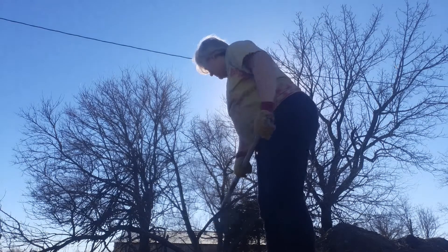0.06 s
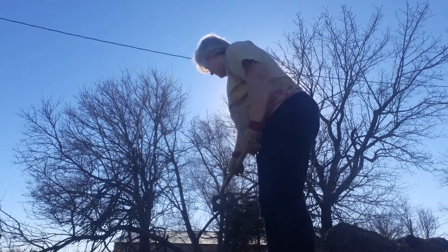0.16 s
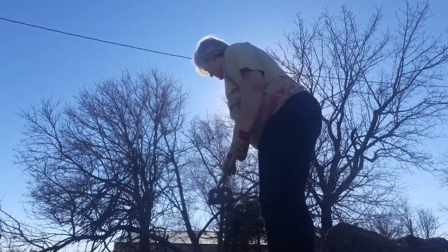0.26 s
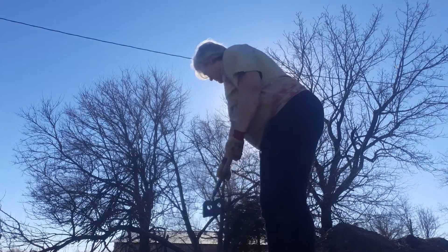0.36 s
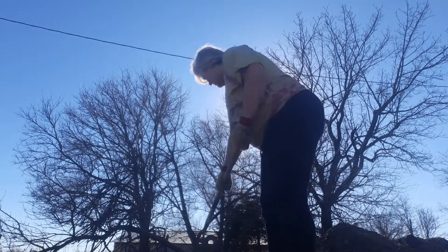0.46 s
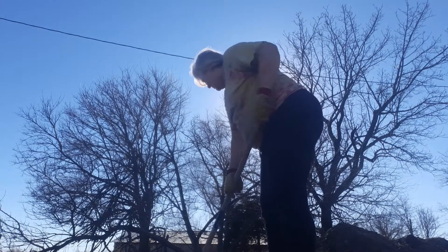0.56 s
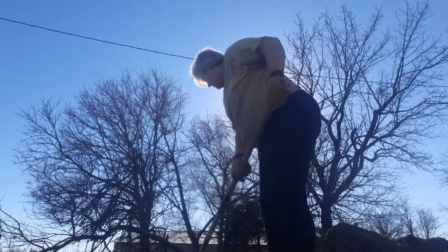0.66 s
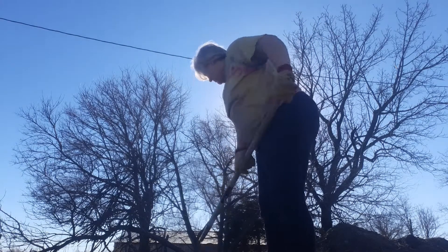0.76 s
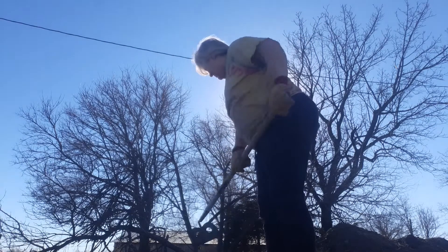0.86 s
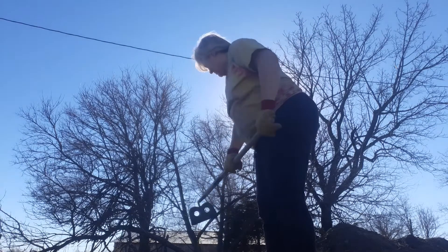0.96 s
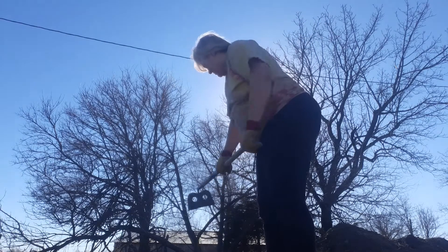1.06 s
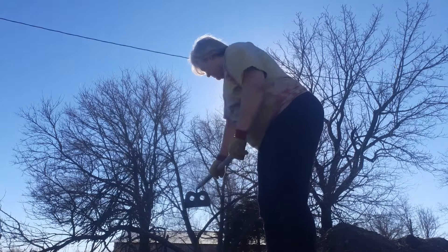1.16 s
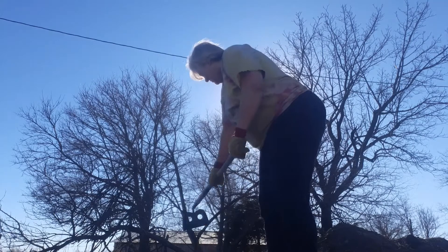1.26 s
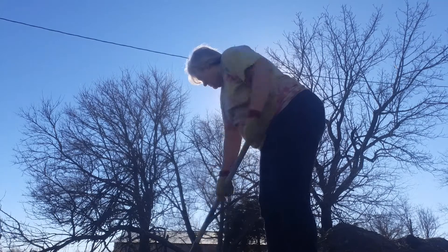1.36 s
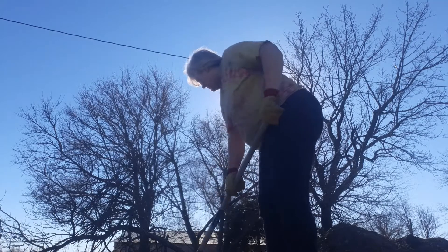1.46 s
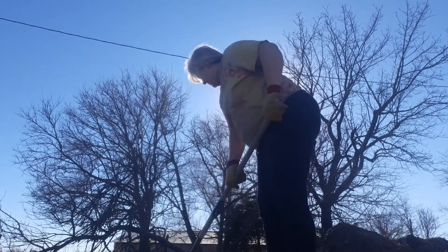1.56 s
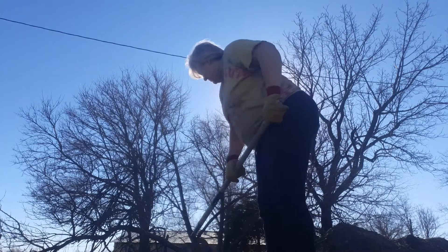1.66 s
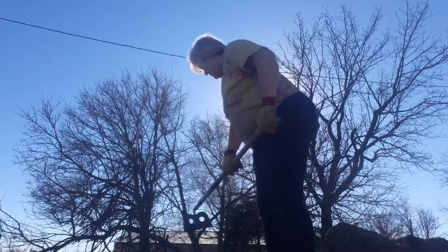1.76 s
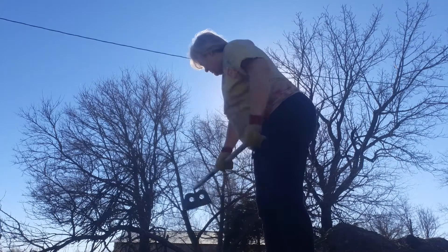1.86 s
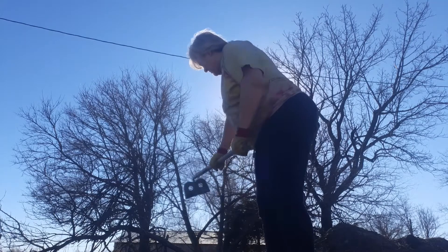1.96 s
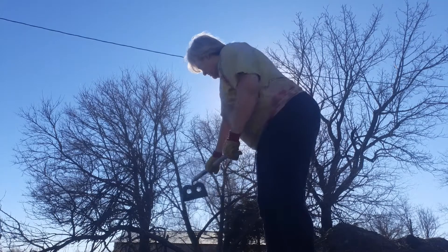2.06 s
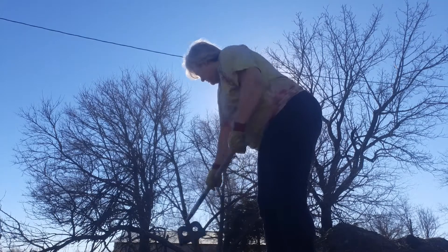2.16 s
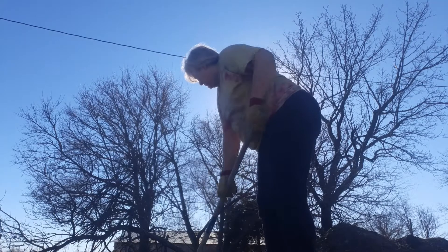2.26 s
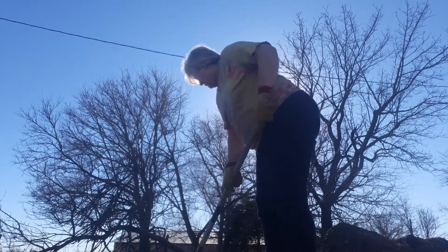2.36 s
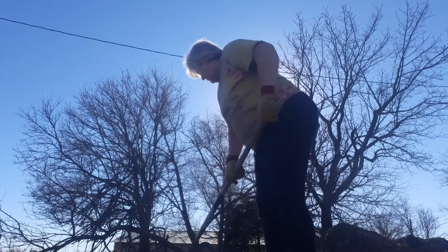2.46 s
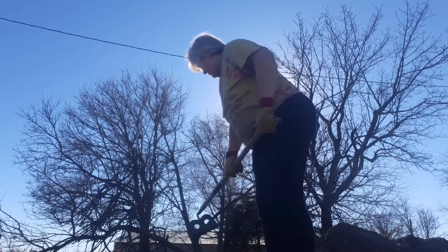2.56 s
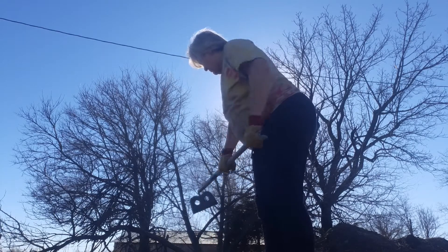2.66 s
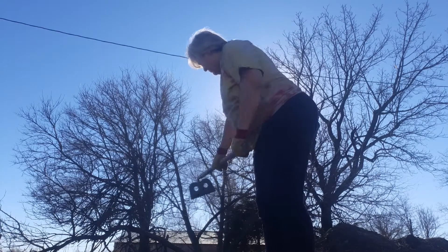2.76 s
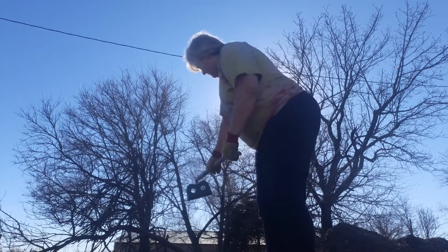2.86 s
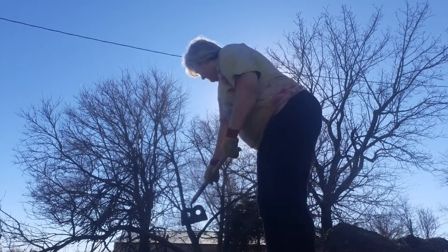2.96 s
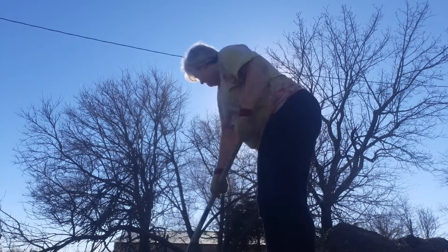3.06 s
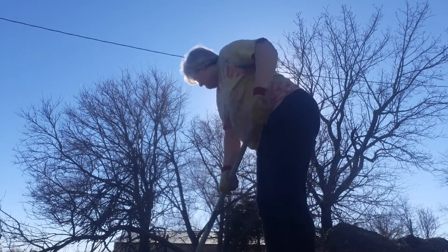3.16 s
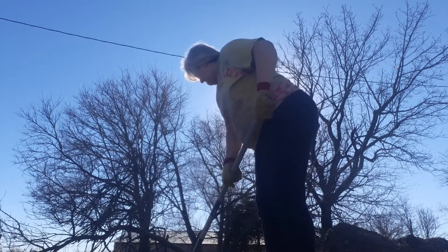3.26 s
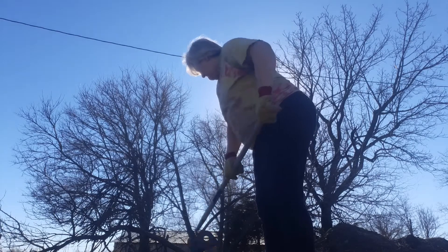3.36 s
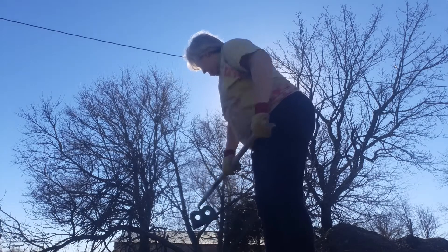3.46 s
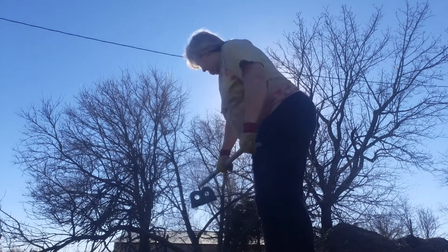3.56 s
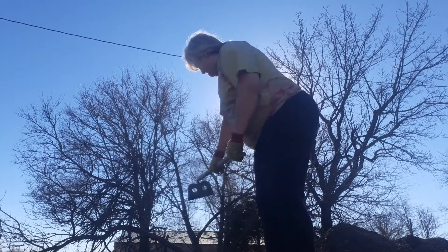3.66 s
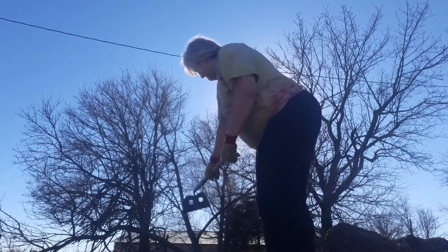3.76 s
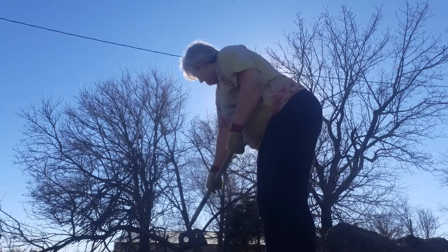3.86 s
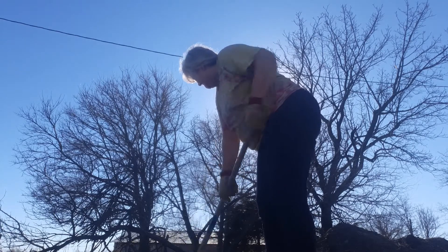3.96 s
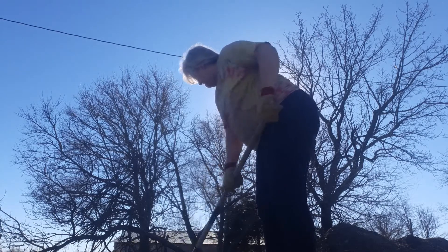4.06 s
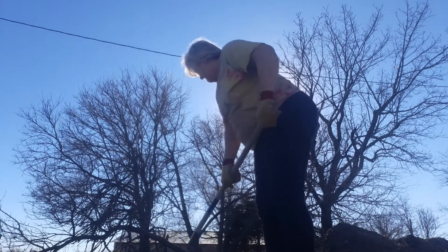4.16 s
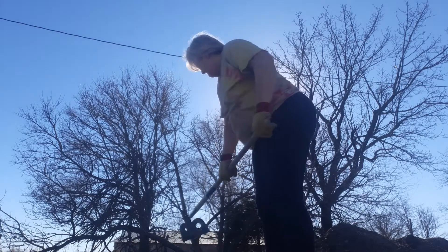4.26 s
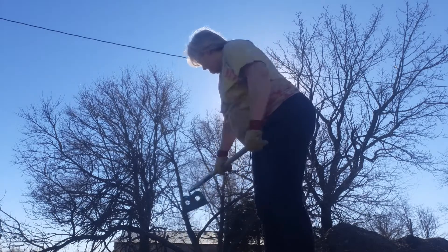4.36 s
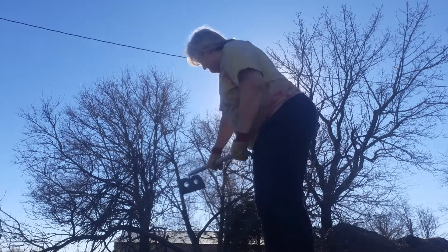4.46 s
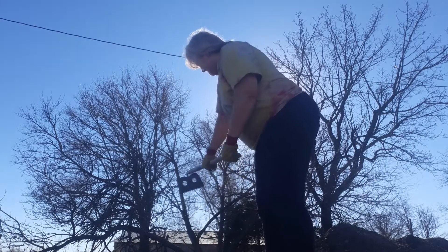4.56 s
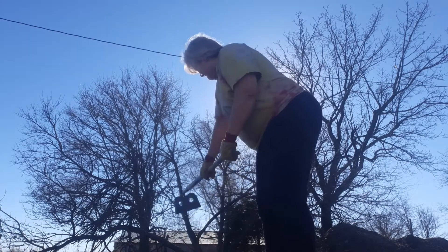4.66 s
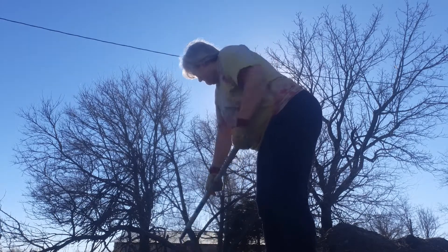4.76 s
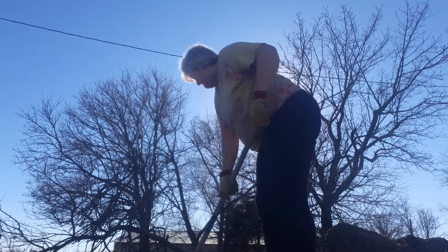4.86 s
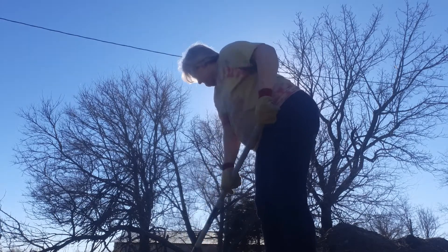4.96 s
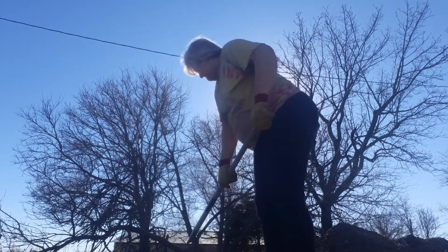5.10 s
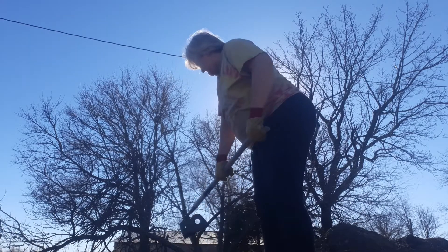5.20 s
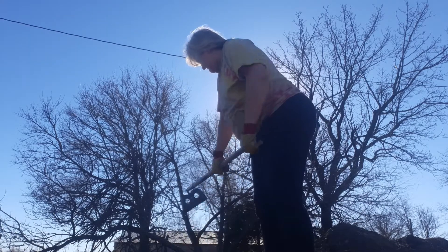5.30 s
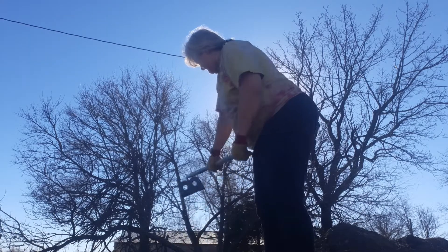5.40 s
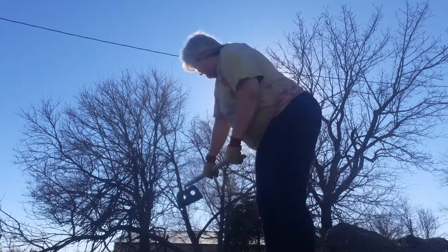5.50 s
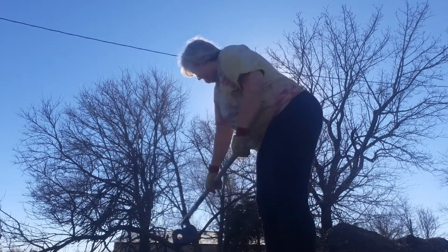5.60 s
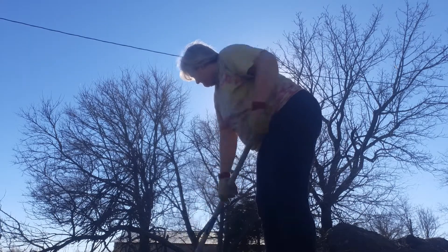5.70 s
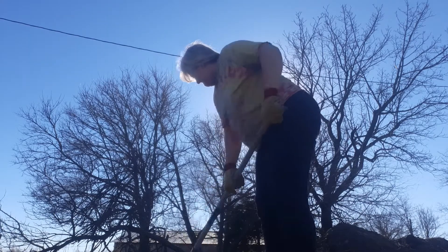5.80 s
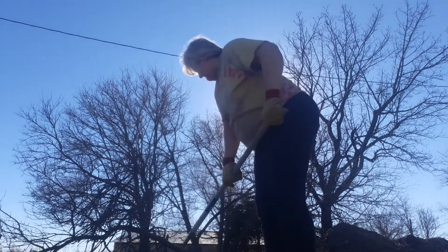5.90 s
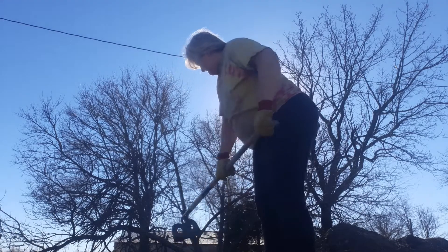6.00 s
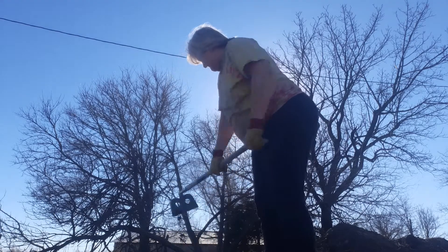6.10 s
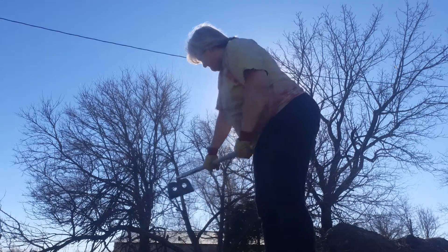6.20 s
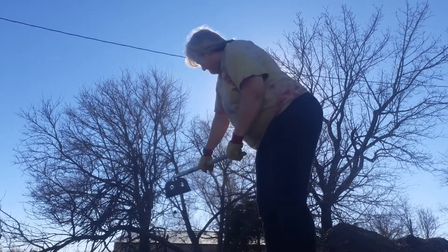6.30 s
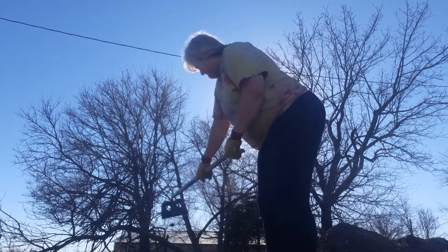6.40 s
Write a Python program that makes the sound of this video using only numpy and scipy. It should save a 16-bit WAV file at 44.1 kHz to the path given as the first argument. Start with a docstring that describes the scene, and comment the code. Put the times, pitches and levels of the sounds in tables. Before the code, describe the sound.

Outdoors, with a small stereo microphone close to the soil, a hoe strikes at an even, unhurried pace. Steel clunks dully into dry clods, with crunching grit and a soft falling thump, and the buried blade stops ringing almost at once. Thin, bright trickles of loose earth, tiny grain ticks and faint tool scuffs fill the gaps. Seven chops in all, the final one clipping a stone. A low rumble and faint microphone hiss continue.

```python
"""A steel garden hoe chops into dry soil seven times, close to a small two-port microphone near the ground.
Grit scrapes and clods knock the blade into ringing; gritty crunch and a thud falling in pitch join each chop.
Loose earth hisses off the blade as dense random grains, with single grains ticking and the tool scuffing
in between; late on, the blade glances off a stone. Low rumble, a faint hum, open air and hiss lie underneath."""
import sys
import numpy as np
from scipy import signal
from scipy.fft import rfft, irfft, next_fast_len
from scipy.io import wavfile

SR = 44100
rng = np.random.default_rng(int(sys.argv[2]) if len(sys.argv) > 2 else 0)


def output_pcm(signal):
    """Save a mono or channel-first signal as 16-bit PCM at the path in sys.argv[1].

    Samples are clipped to [-1, 1] before scaling.
    """
    pcm = np.clip(np.atleast_2d(signal).T, -1, 1) * 32767
    wavfile.write(sys.argv[1], SR, np.round(pcm).astype(np.int16))


N = 284004
SIZE = next_fast_len(N + 4096)   # FFT length, with room for filter tails
HZ = np.maximum(np.arange(SIZE // 2 + 1) * SR / SIZE, 1)

# All table levels are relative: layer gains, the ports and the final filters shape them further.
# background, with a faint hum around 800 to 1000 Hz: time_s, rumble_db, air_db, faint_hum_db
BACKGROUND_LEVELS = [(0.0, -64.5, -81.5, -98), (0.5, -68.5, -82.5, -100), (0.9, -62.5, -76.5, -90.5),
                     (1.3, -67, -82.5, -99), (1.9, -63.5, -79, -91), (2.25, -64, -83, -100),
                     (2.8, -59, -82, -91), (3.4, -64, -79, -88), (4.0, -63.5, -83.5, -97.5),
                     (4.7, -65, -80.5, -94), (5.35, -66, -80, -86.5), (5.7, -65.5, -83, -99.5),
                     (6.44, -66, -80.5, -90)]
# earth pouring off the blade: start_s, end_s, high_hiss_db, band_near_8500_hz_db, rustle_db, dying_db_per_s
POURS = [(0.0, 0.13, -78.5, -80.5, -88.5, 113), (0.157, 0.21, -101, -94, -85.5, 68),
         (0.66, 0.684, -62, -66.5, -78, 503), (0.839, 0.965, -68.5, -72.5, -83, 125),
         (1.168, 1.226, -86.5, -87.5, -109, 142), (1.676, 1.788, -76, -75.5, -93, 97.5),
         (1.843, 2.044, -99.5, -93, -86.5, 101.5), (2.57, 2.737, -78, -79, -88.5, 165.5),
         (3.426, 3.565, -90, -85.5, -93, 130), (3.612, 3.652, -88, -81, -98, 132.5),
         (3.81, 3.887, -94, -85.5, -92.5, 169.5), (4.392, 4.55, -89, -85, -90, 116),
         (5.042, 5.123, -85, -82, -93.5, 128.5), (5.2, 5.284, -79, -79.5, -83.5, 165),
         (6.023, 6.06, -78.5, -79, -89, 121.5), (6.144, 6.257, -82.5, -78, -86.5, 81),
         (6.367, 6.438, -90, -82.5, -108, 131)]
# knocks of clods and pebbles on the blade: start_s, level_db, dullness (0-1)
KNOCKS = [(0.581, -28, 0.02), (0.591, -24, 0.66), (0.635, -36.5, 0.36), (0.659, -48, 0.4),
          (1.435, -33.5, 0.5), (1.442, -21.5, 0.23), (1.471, -28.5, 0.34), (1.49, -44.5, 1),
          (2.295, -32, 0.67), (2.301, -26, 0.53), (2.309, -25.5, 0.24), (2.319, -56, 0.7),
          (2.331, -35, 0.65), (2.348, -34.5, 0.47), (3.138, -31, 0.23), (3.147, -22.5, 0.48),
          (3.17, -26, 0.69), (3.19, -56, 0.5), (3.997, -26, 0.36), (4.008, -35.5, 0), (4.03, -58, 0.4),
          (4.069, -48, 0.2), (4.867, -27, 0.7), (4.872, -23.5, 0.52), (4.887, -42, 0.37), (4.909, -51, 0.8),
          (5.007, -50, 0.27), (5.242, -46.5, 0.71), (5.718, -42, 0.76), (5.738, -48, 0.6),
          (5.749, -51, 0.2), (5.76, -34, 0), (5.774, -25, 0.68), (5.798, -34, 0.22)]
# chops, and a second push in the first: full_bite_s, entry_s, drag_s, base_dying_db_per_s,
# low_blade_db, high_blade_db, handle_db, edge_db, crunch_db
CHOPS = [(0.586, 0.038, 0.048, 380, -48, -54, -48, -68, -62),
         (0.645, .025, 0.06, 447, -55, -68, -62, -76, -73),
         (1.445, 0.038, 0.033, 408.5, -47.5, -47.5, -45, -60, -62.5),
         (2.3, 0.019, 0.048, 398, -41.5, -49.5, -46.5, -58.5, -60.5),
         (3.148, 0.035, 0.013, 315, -46.5, -52, -42.5, -64, -65.5),
         (4, 0.024, 0.0063, 313, -48, -53, -42, -66, -68),
         (4.875, 0.032, 0.011, 400, -45, -51, -43, -65, -63.5),
         (5.721, 0.0075, 0.074, 320.5, -39.5, -51.5, -41, -57.5, -60)]
# ground thuds: start_s, level_db, first_hz, last_hz, glide_s, t60_s, rumble_left_behind_db
THUDS = [(0.585, -32, 270, 72.5, 0.0098, 0.065, -53.5), (1.447, -32.5, 253, 82, 0.01, 0.069, -54.5),
         (2.3, -43.5, 257, 77.3, 0.014, 0.14, -55), (3.145, -27.5, 303, 72, 0.012, 0.067, -50),
         (3.996, -43.5, 262, 77.4, 0.015, 0.1, -56), (4.875, -36, 270, 83.5, 0.0188, 0.077, -54),
         (5.226, -59, 1107, 370, 0.005, 0.032, -83), (5.759, -30, 180, 73.5, 0.0083, 0.045, -54.5)]

ENTRY_DB = 43.5        # a chop and its spray swell by this much over their entry time
HIGH_LATE_S = 0.012    # high ring, handle and crunch peak this much later


def amp(db):
    """Decibels to gain."""
    return 10 ** (np.asarray(db) / 20)


def rms_one(x):
    """Scale to rms 1."""
    return x / np.sqrt(np.mean(x ** 2) + 1e-20)


def in_time(rows):
    """Columns of a table as curves over all samples."""
    s, *columns = np.transpose(rows)
    return np.array([np.interp(np.arange(N) / SR, s, column) for column in columns])


def at_hz(points):
    """A spectrum table read at every FFT frequency, straight lines over log frequency."""
    hz, values = np.transpose(points)
    return np.interp(np.log(HZ), np.log(hz), values)


def filtered(x, response):
    """Apply a frequency response."""
    return irfft(rfft(x, SIZE) * response, SIZE)[..., :N]


def coloured(x, spectrum):
    """Give a spectrum, silent beyond its ends; rms 1."""
    inside = (HZ > spectrum[0][0]) & (HZ < spectrum[-1][0])
    return rms_one(filtered(x, amp(at_hz(spectrum)) * inside))


def ring(force, hz, t60):
    """One mode as a decaying two-pole resonance: a unit click rings at height 1."""
    r, w = amp(-60 / (t60 * SR)), 2 * np.pi * hz / SR
    # the tiny offset avoids slow arithmetic in silence
    return signal.lfilter([0, np.sin(w)], [1, -2 * r * np.cos(w), r * r], force + 1e-18)


def grit(per_s, spread_db):
    """Random contacts of uneven size and either sign; rms 1."""
    sizes = amp(spread_db * np.minimum(rng.exponential(1, N), 5)) * rng.choice([-1, 1], N)
    return rms_one(sizes * (rng.random(N) < per_s / SR))


def swell(s, hold, db, rise_db_per_s, sag_db_per_s, fall_db_per_s):
    """Gain of a set of events: each rises to its level at s, sags while it holds, then falls; powers add."""
    t = np.arange(N) / SR - np.reshape(s, (-1, 1))
    hold, db, rise = (np.reshape(v, (-1, 1)) for v in (hold, db, rise_db_per_s))
    level = db + rise * np.minimum(t, 0)
    level -= sag_db_per_s * np.clip(t, 0, hold)
    level -= fall_db_per_s * np.maximum(t - hold, 0)
    return np.sqrt(np.sum(amp(2 * level), axis=0))


def ports(x):
    """The two ports hear a near source with different colour and delay."""
    # hz, left_minus_right_db
    colour = [(60, 0), (300, 2.5), (1000, 1.7), (2700, 0), (4200, 1), (6400, 3), (8500, 15), (10300, -2),
              (11500, -1.5), (12800, 9.5), (14500, 4.5)]
    # hz, left_lead_radians
    lead = [(20, 0), (300, .15), (1100, .5), (1400, .5), (2400, 1.1), (3900, .76), (5000, 4), (6500, 5),
            (7900, 5), (8400, 3), (10400, 5.5), (11200, 7), (14100, 8), (16000, -4)]
    half = amp(at_hz(colour) / 2) * np.exp(0.5j * at_hz(lead))   # each port takes half the difference
    return np.array([filtered(x, half), filtered(x, 1 / half)])


def background(spectrum):
    """Stereo noise, nearly alike in the deep bass and mostly unrelated in the treble; rms 1."""
    # hz, left_right_likeness (negative is taken as 0)
    likeness = [(60, 0.98), (180, 0.74), (550, 0.22), (1650, 0.089), (4970, -0.48), (15000, 0.092)]
    alike = np.clip(at_hz(likeness), 0, 1)
    mid, side = rng.standard_normal((2, N))
    mid, side = filtered(mid, np.sqrt(1 + alike)), filtered(side, np.sqrt(1 - alike))
    return coloured(np.array([mid + side, mid - side]), spectrum)


def rumble():
    """Low wandering noise that swells for a while after every thud."""
    # hz, db_per_hz
    spectrum = [(12, -46), (20, -64), (32, -33), (57, -3), (75, 4.5), (87, -6), (103, -7.5), (179, -17),
                (267, -25), (381, -35), (600, -56), (780, -70), (1320, -120)]
    s, *_, after_db = np.transpose(THUDS)
    after_thuds = swell(s + 0.087, 0, after_db, 152.5, 0, 53)
    gain = np.hypot(amp(in_time(BACKGROUND_LEVELS)[0]), after_thuds)
    return amp(1.0) * gain * background(spectrum)


def open_air():
    """Faint open-air noise whose level wanders slowly."""
    # hz, db_per_hz
    spectrum = [(180, -12), (300, 2.5), (329, -3.5), (361, -1), (507, -6), (562, -6), (999, -10.5),
                (3500, -23), (4550, -46.5), (7700, -120)]
    return amp(in_time(BACKGROUND_LEVELS)[1] + 0.5) * background(spectrum)


def self_noise():
    """Steady hiss of the microphone itself."""
    # hz, db_per_hz
    spectrum = [(880, -56), (1500, -13), (1670, -6.5), (1790, -9), (1940, -6), (2860, -10), (4550, -9.5),
                (7100, -16.5), (12000, -7), (16000, -6.5)]
    return amp(-82.5) * background(spectrum)


def pour(db):
    """Gain of a layer while earth pours off the blade."""
    start, end, *_, dying = np.transpose(POURS)
    return swell(start, end - start, db, 261, 12, dying[:, None])


def spray():
    """Gain of the earth thrown by each chop: a short burst over a longer tail."""
    # peak_s, rise_s, burst_db, tail_db
    throws = [(0.587, 0.036, -58, -58.5), (1.445, 0.043, -59, -60), (2.299, .012, -50.5, -60.5),
              (3.146, 0.047, -58.5, -66), (3.989, 0.016, -55.5, -64), (4.88, 0.04, -53.5, -70),
              (5.724, .012, -55, -61.5)]
    s, rise, burst_db, tail_db = np.transpose(throws)
    burst = swell(s, 0, burst_db, ENTRY_DB / rise, 0, 439)
    tail = swell(s, 0, tail_db, ENTRY_DB / rise, 0, 101.5)
    return np.hypot(burst, tail)


def earth():
    """Dense grains in a high hiss and a narrower band near 8.5 kHz; part from one spot, part scattered about."""
    # high hiss: hz, db_per_hz
    hiss_spectrum = [(5290, -29.5), (9000, -10), (9490, -8.5), (10700, 0), (12000, 4), (15100, -2),
                     (16000, 5)]
    # band near 8.5 kHz: hz, db_per_hz
    band_spectrum = [(3000, -20), (5000, -17.5), (6800, -17), (7700, -11), (8500, 0), (9400, -5),
                     (10500, -15)]
    spot_share = 0.65   # of the power
    spot = ports(grit(per_s=9000.0, spread_db=3.5))
    scattered = np.array([grit(per_s=6800.0, spread_db=4.0), grit(per_s=36000.0, spread_db=4.0)])
    grains = np.sqrt(spot_share) * spot + np.sqrt(1 - spot_share) * scattered

    # the pouring flickers at random: 56 new levels per second, spread by 2.5 dB
    steps = np.arange(400) / 56
    flicker = amp(2.5 * np.interp(np.arange(N) / SR, steps, rng.standard_normal(400)))
    hiss_db, band_db = np.transpose(POURS)[2:4]
    thrown = spray()
    hiss_gain = np.hypot(thrown, flicker * pour(hiss_db))
    band_gain = np.hypot(amp(-2.5) * thrown, flicker * pour(band_db))
    high_hiss = amp(4.5) * hiss_gain * coloured(grains, hiss_spectrum)
    return high_hiss + amp(2.0) * band_gain * coloured(grains, band_spectrum)


def rustle():
    """A faint dry rustle of sparser grains while the earth slides."""
    # hz, db_per_hz
    spectrum = [(1100, -22), (1500, -4), (1850, -2.5), (2200, -6.5), (2900, -13), (4000, -30)]
    return pour(np.transpose(POURS)[4]) * coloured(grit(per_s=2600.0, spread_db=2.5), spectrum)


def ticks():
    """Each grain on the blade is a tiny burst ringing briefly at its own pitch, over a thin broad snap."""
    # start_s, level_db, centre_hz
    grains = [(0.1163, -59, 8700), (0.6482, -39.5, 11700), (0.682, -49, 8300), (0.706, -41.5, 11200),
              (0.9866, -52, 11700), (1.044, -63, 8350), (1.223, -60, 8770), (1.6314, -59, 12100),
              (1.698, -58, 8500), (1.7044, -56.5, 8350), (1.715, -56.5, 8580), (1.72, -48.5, 8400),
              (1.733, -50, 9900), (1.749, -53, 9800), (1.7628, -51, 12200), (2.395, -46, 8200),
              (2.6833, -58, 11260), (3.6594, -65, 8800), (3.8114, -62, 8600), (3.8467, -62, 8900),
              (3.8771, -64, 8330), (5.8002, -44.5, 11900), (5.938, -61, 8900), (5.994, -66, 8500),
              (6.0233, -58, 8470), (6.0454, -54.5, 8600), (6.1471, -53, 9300), (6.223, -58, 9530),
              (6.2707, -69, 8800)]
    out, t = np.zeros(N), np.arange(400) / SR
    snap_band = signal.butter(3, [7500, 15500], "band", fs=SR, output="sos")
    for s, db, hz in grains:
        burst = rng.standard_normal(400) * t ** 2 * np.exp(-t / 0.0004)
        tick = ring(ring(burst, hz, 0.0016), hz, 0.0016)
        snap = signal.sosfilt(snap_band, burst)
        both = tick / np.abs(tick).max() + 0.74 * snap / np.abs(snap).max()
        at = round(s * SR)
        out[at:at + 400] += amp(db - 1.5) * both
    return out


def bite(db, dying_share, late=0):
    """Gain of a layer through entry, drag and stop of every chop."""
    s, entry, drag, dying = np.transpose(CHOPS)[:4]
    rise_db_per_s = ENTRY_DB / (entry + late)
    hold = np.maximum(drag - late, 0)
    return swell(s + late, hold, db, rise_db_per_s, 230, dying_share * dying[:, None])


def rising(x, hz):
    """A soft contact: the ring builds up over the crumbling time instead of starting at once."""
    crumble_s = 0.0014   # time constant of a crumbling clod
    r, w = np.exp(-1 / (crumble_s * SR)), 2 * np.pi * hz / SR
    return signal.lfilter([(1 - r * r) / 2, 0, (r * r - 1) / 2], [1, -2 * r * np.cos(w), r * r], x)


def body(modes, scrape, knock_share):
    """Grit under the stroke and short crumbling knocks drive the same modes."""
    soil_grip = 0.5   # the buried blade rings this share of its free time after a knock
    start_s, knock_db, _ = np.transpose(KNOCKS)
    at = np.round((start_s + 0.002086) * SR).astype(int)   # every knock sounds about 2 ms after its listed time
    contacts = grit(per_s=700.0, spread_db=3.5)
    scraped = sum(amp(db) * ring(contacts, hz, t60) for hz, db, t60 in modes)
    out = scrape * rms_one(scraped)
    for hz, db, t60 in modes:
        force = np.zeros(N)
        strength_db = knock_db + db - 8.0 + rng.normal(0, 3.84, len(at))   # each knock excites modes unevenly
        force[at] = knock_share * amp(strength_db) * rng.choice([-1, 1], len(at))
        out += rising(ring(force, hz, soil_grip * t60), hz)
    return out


def hoe():
    """Blade ring and handle knock of every chop, a faint hum between, and a delayed bounce off the soil."""
    # low modes of the blade: hz, level_db, free_t60_s
    low_modes = [(805, -7, 0.14), (845, -6.5, 0.096), (876, -6.5, 0.041), (983.4, 3, 0.052),
                 (954, -1, 0.024)]
    # high modes of the blade: hz, level_db, free_t60_s
    high_modes = [(1337, 1, 0.062), (1402, -9.5, 0.012), (1609, 8, 0.022), (1634, -8, 0.037),
                  (1698, -2.5, 0.091), (1931, -7, 0.093), (2205, -47, 0.017)]
    # modes of the edge: hz, level_db, free_t60_s
    edge_modes = [(2470, 1.5, 0.023), (2450, -2, 0.19), (2593, 0.5, 0.03), (2600, 8, 0.038)]
    # modes of the handle: hz, level_db, free_t60_s
    handle_modes = [(268.2, -1, 0.071), (325.6, -2.5, 0.071), (391.6, -1.5, 0.079), (440.5, -6.5, 0.22)]
    low_db, high_db, handle_db, edge_db = np.transpose(CHOPS)[4:8]
    faint_hum = amp(in_time(BACKGROUND_LEVELS)[2])   # shares the pitches of the low modes
    low = np.hypot(bite(low_db, 0.94), faint_hum)
    high = bite(high_db, 1.1, HIGH_LATE_S)
    edge = bite(edge_db, 0.95)
    handle = bite(handle_db, 0.94, HIGH_LATE_S)

    # dull knocks go to the handle, bright ones to the blade
    dull = np.clip(np.transpose(KNOCKS)[2], 0, 1)
    bright = 1 - dull
    rings = body(low_modes, low, bright) + body(high_modes, high, 0.28 * bright)
    rings += body(edge_modes, edge, 0.027 * bright) + body(handle_modes, handle, dull)
    echo_s, echo_gain = 0.000829, 0.4   # the bounce off the soil partly cancels around 600 Hz
    return filtered(rings, 1 + echo_gain * np.exp(-2j * np.pi * HZ * echo_s))


def crunch():
    """Gritty crunch through each chop with a crack at every knock, partly scattered about."""
    # hz, db_per_hz
    spectrum = [(1710, -29), (2900, -10.5), (3150, -2), (3320, -4), (3990, 2.5), (4860, -2), (7500, -3.5),
                (9750, -40), (16500, -120)]
    scatter_share = 0.57   # share of the power that reaches the two ports unrelated
    s, db, _ = np.transpose(KNOCKS)
    cracks = swell(s + 0.0033, 0, db - 37, 9000.0, 0, 1500.0)   # each knock cracks it open briefly
    gain = np.hypot(cracks, bite(np.transpose(CHOPS)[8], 0.8, HIGH_LATE_S))
    spot, *scattered = (grit(per_s=4000.0, spread_db=3.5) for _ in range(3))
    grains = np.sqrt(1 - scatter_share) * ports(spot) + np.sqrt(scatter_share) * np.array(scattered)
    return gain * coloured(grains, spectrum)


def thuds():
    """The ground wave spreads out: high pitches arrive first, the lowest roll in last, in uneven lumps."""
    out, t = np.zeros(N), np.arange(int(0.4 * SR)) / SR
    for s, db, first_hz, last_hz, glide, t60, _ in THUDS:
        lumps = np.interp(t, np.arange(60) * 0.0054, rng.standard_normal(60))
        glide_turns = (first_hz - last_hz) * glide * (1 - np.exp(-t / glide))
        turns = last_hz * t + glide_turns + 0.16 * lumps
        shape = (1 - np.exp(-t / 0.0045)) ** 2 * amp(-60 * (t / t60) ** 3.9)
        gain = amp(db + 2.6 * lumps) * shape / shape.max()
        at = round(s * SR)
        out[at:at + len(t)] += gain * np.sin(2 * np.pi * turns)
    return signal.sosfilt(signal.butter(4, 55.0, "high", fs=SR, output="sos"), out + 1e-18)


def scuffs():
    """Brief rubs of the tool between chops: noise in one resonance, narrow or broad, quick to start and fading."""
    # start_s, level_db, centre_hz, approximate_width_hz, decay_constant_s
    rubs = [(2.739, -73, 6440, 397, 0.039), (2.75, -68.5, 820, 298, 0.042),
            (4.388, -70.5, 1470, 910, 0.035), (5.017, -63, 896, 294, 0.038), (5.235, -56, 416, 400, 0.017),
            (6.02, -73, 1030, 600, 0.013), (6.234, -63, 1750, 930, 0.015)]
    out, t = np.zeros(N), np.arange(int(0.15 * SR)) / SR
    for s, db, hz, width_hz, decay in rubs:
        rub = rng.standard_normal(len(t)) * (1 - np.exp(-t / 0.00065)) * np.exp(-t / decay)
        t60 = 1.7 / width_hz
        rub = ring(ring(rub, hz, t60), hz, t60)
        at = round(s * SR)
        out[at:at + len(t)] += amp(db) * rub / np.abs(rub).max()
    return out


def stone():
    """A few milliseconds of steel skidding on stone, then a short spray of chips, ringing the high modes."""
    # high modes of the edge: hz, level_db, t60_s
    stone_modes = [(6400, -22, .006), (8480, -9, .012), (10250, -3, .011), (10700, -8, .008),
                   (11700, -10, .006), (12300, -7, .006), (12850, 3, .011), (13600, -8, .005),
                   (14100, -5, .006), (15000, -10, .004)]
    start_s, level_db, rub_s = 5.7262, -18, 0.0038
    t = np.arange(int(0.08 * SR)) / SR
    after = np.clip(t - rub_s, 0, 1)
    chips = 0.12 * amp(-60 * after / 0.05)
    skid = np.clip(t / 0.001, 0, 1) * (amp(-60 * after / 0.008) + chips)
    rings = np.zeros(len(t))
    for hz, db, t60 in stone_modes:
        rings += amp(db) * rms_one(ring(skid * rng.standard_normal(len(t)), hz, t60))
    rings = signal.sosfilt(signal.butter(4, 6000, "high", fs=SR, output="sos"), rings)
    out, at = np.zeros(N), round(start_s * SR)
    out[at:at + len(t)] = amp(level_db) * rings / np.abs(rings).max()
    return out


def scene():
    """Hoe and earth close by, over the rumble, open air and hiss."""
    one_spot = hoe() + thuds() + scuffs() + ticks() + stone() + rustle()
    near = ports(one_spot) + crunch() + earth()
    return near + rumble() + open_air() + self_noise()


def record(dry):
    """The microphone drops the deepest bass; the top is cut steeply."""
    bass_cut = signal.sosfilt(signal.butter(1, 30.0, "high", fs=SR, output="sos"), dry)
    return signal.sosfilt(signal.cheby2(20, 70, 16250, fs=SR, output="sos"), bass_cut)


dry = scene()
out = record(dry)
output_pcm(out)
```